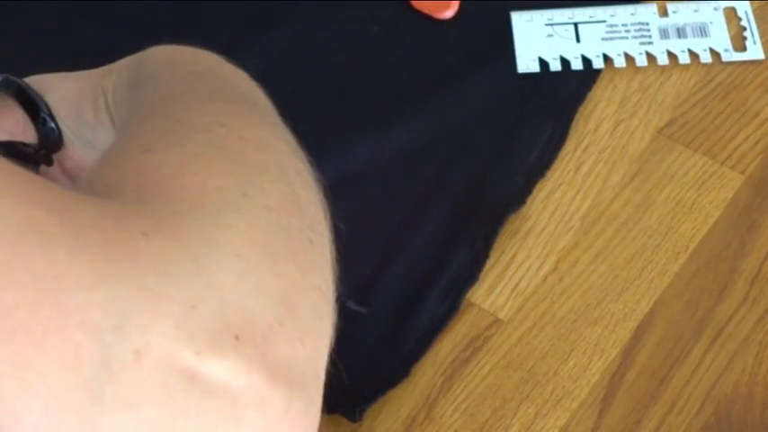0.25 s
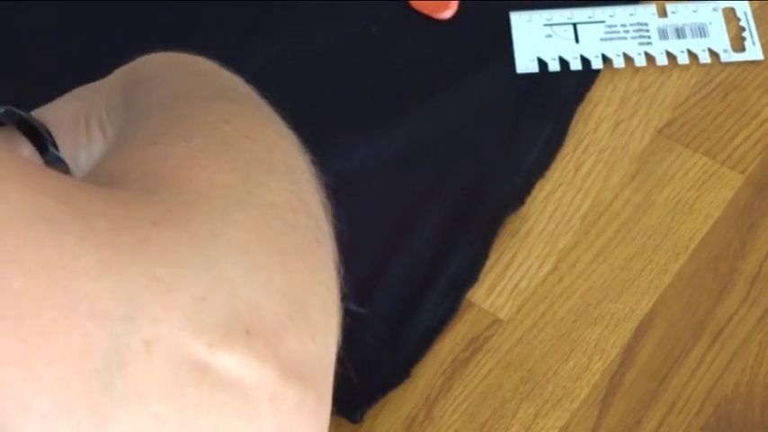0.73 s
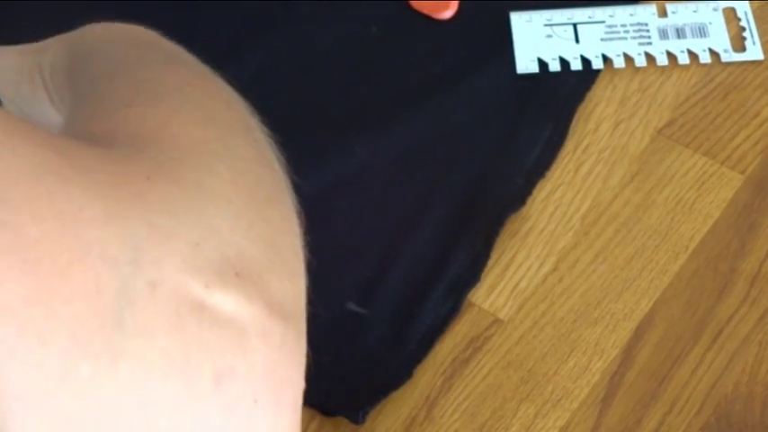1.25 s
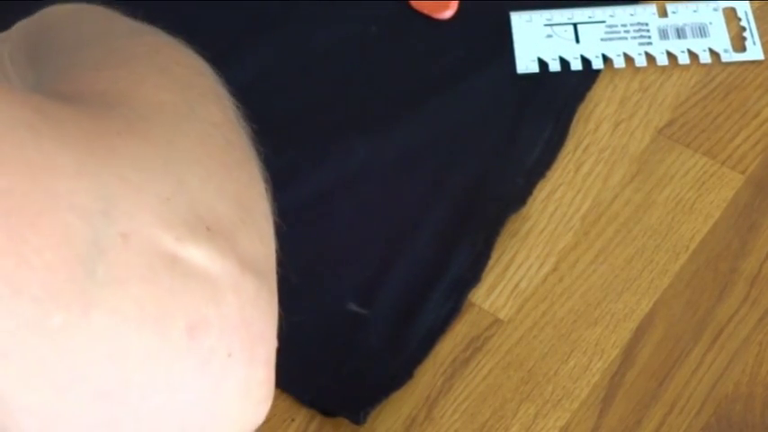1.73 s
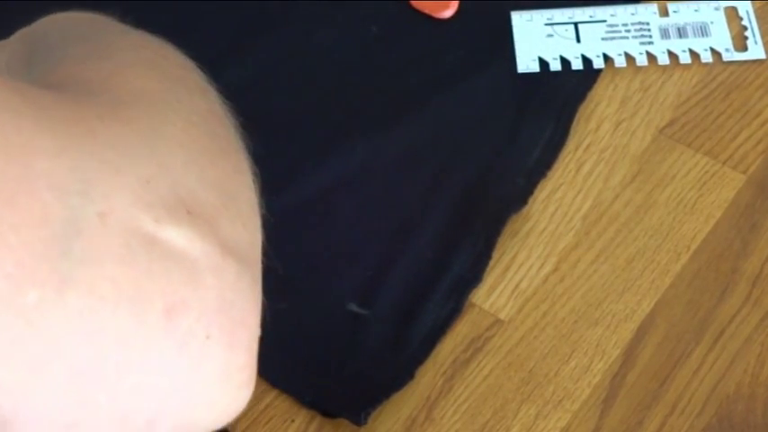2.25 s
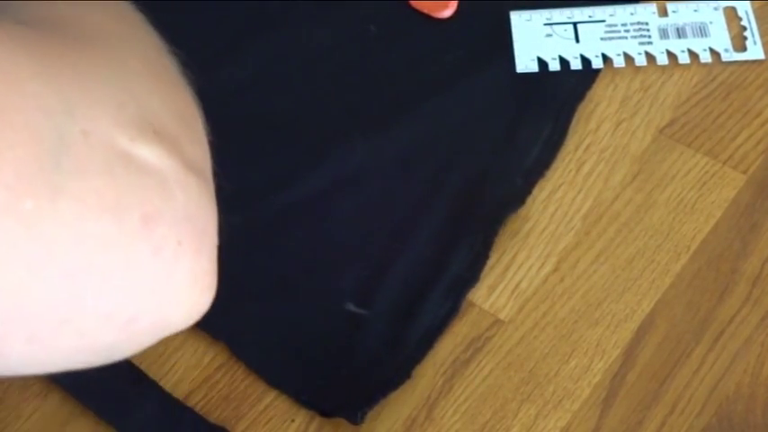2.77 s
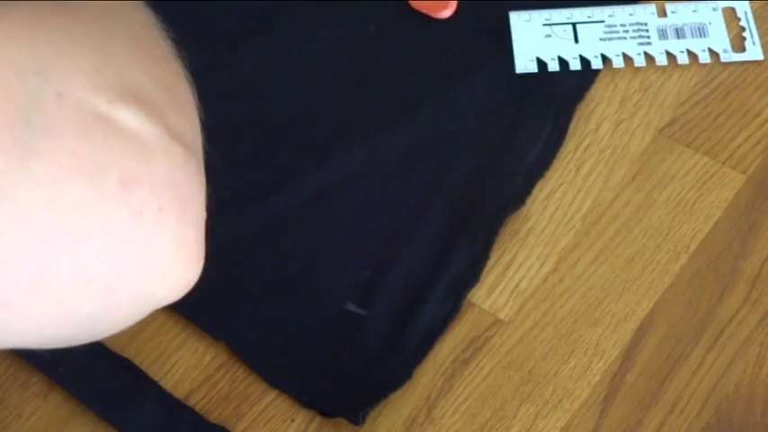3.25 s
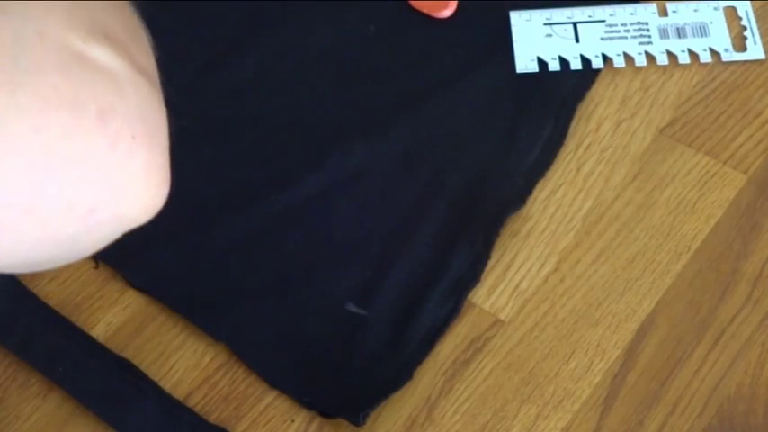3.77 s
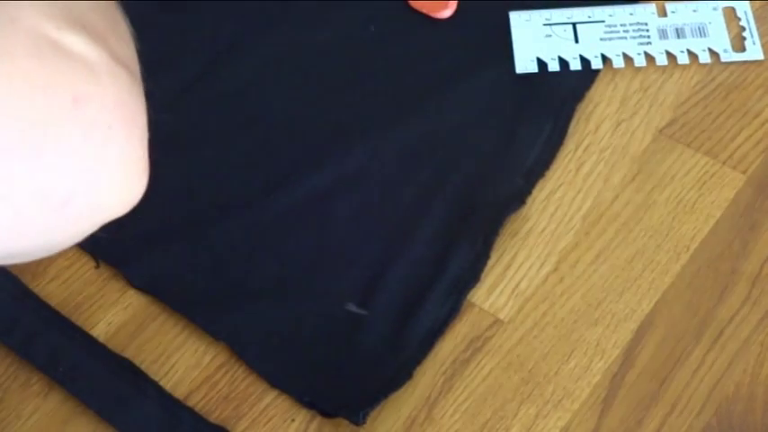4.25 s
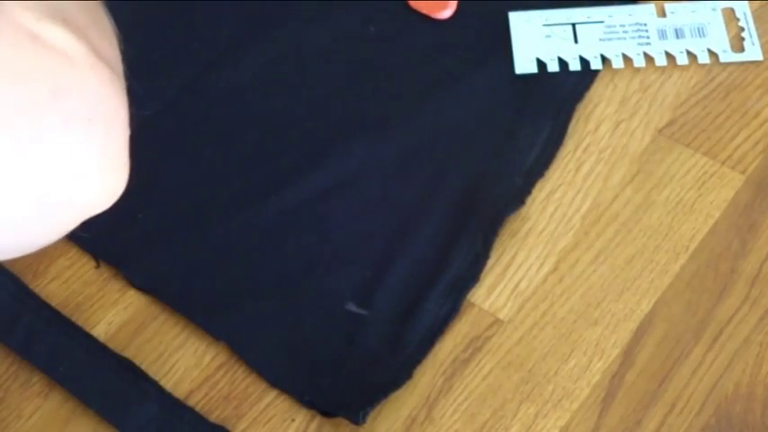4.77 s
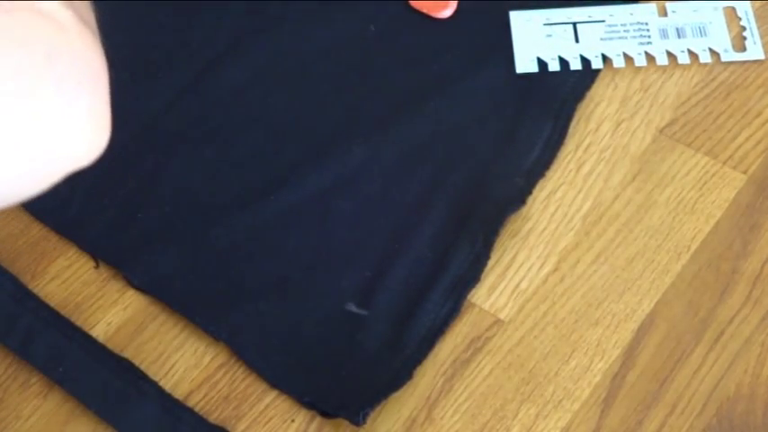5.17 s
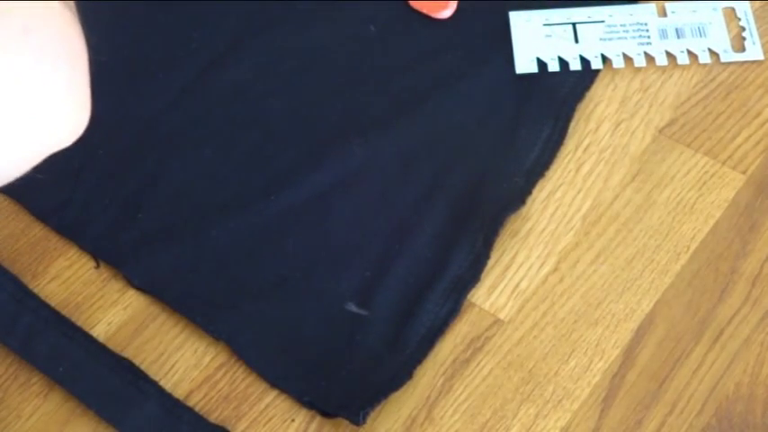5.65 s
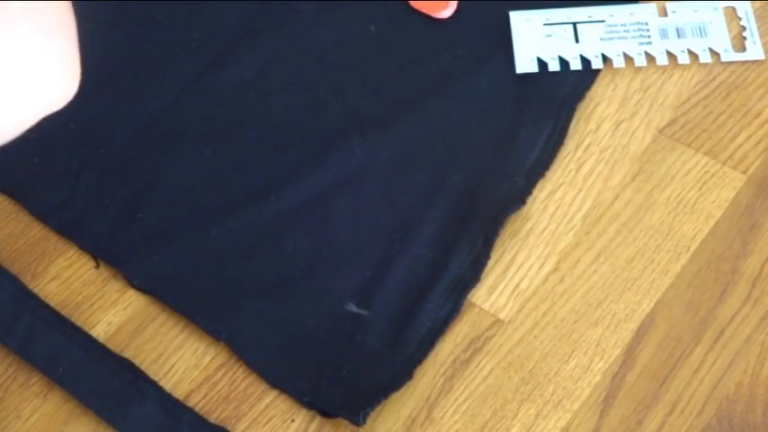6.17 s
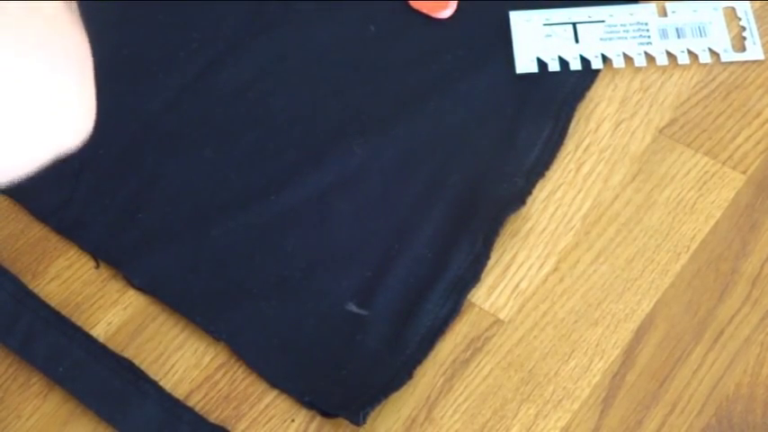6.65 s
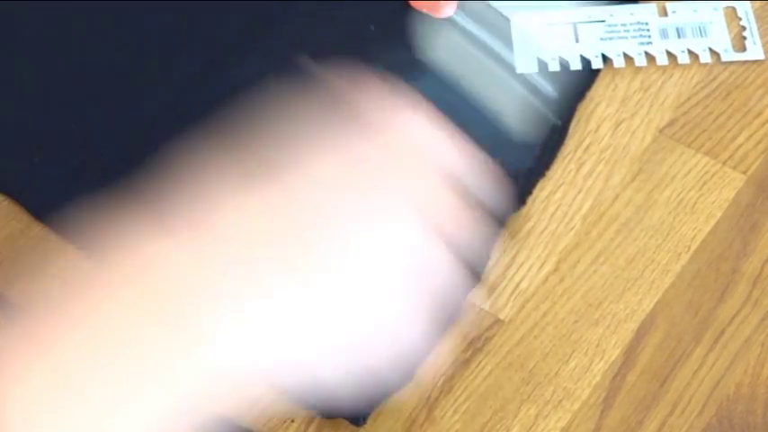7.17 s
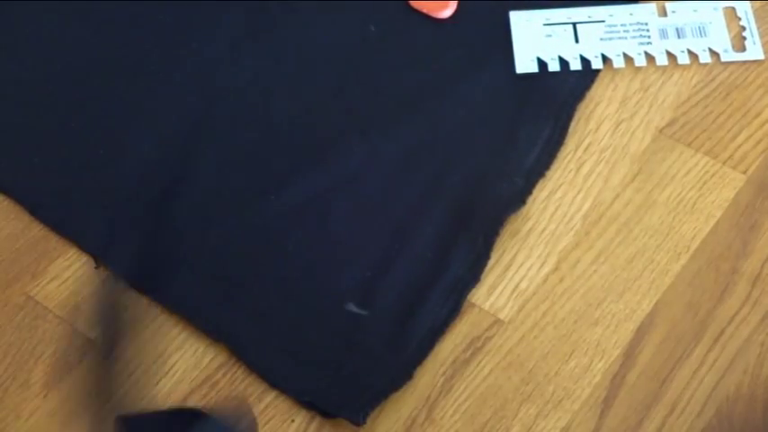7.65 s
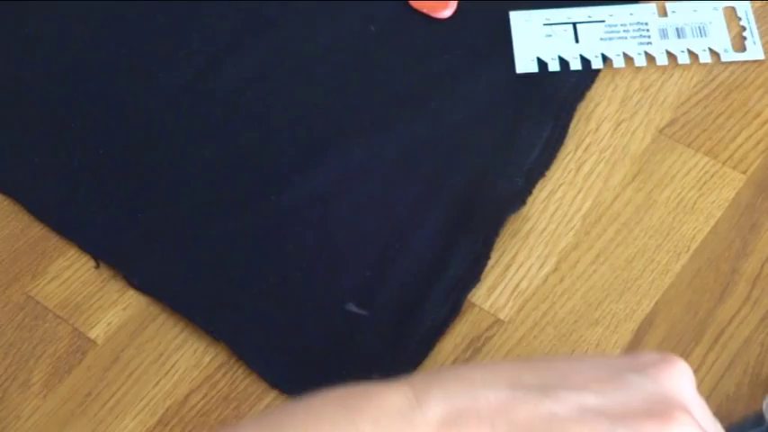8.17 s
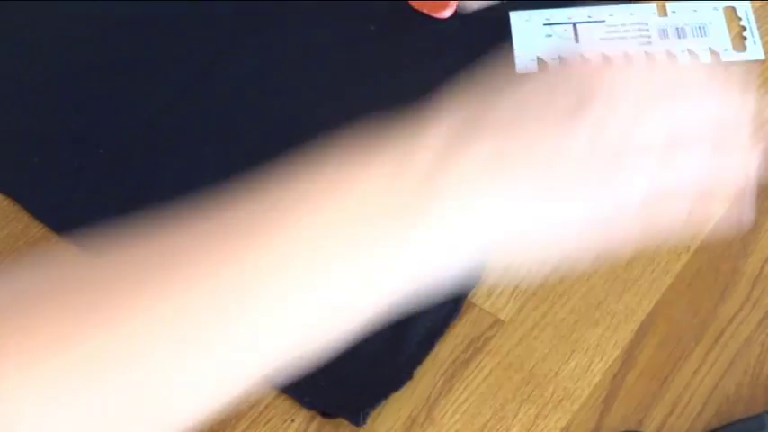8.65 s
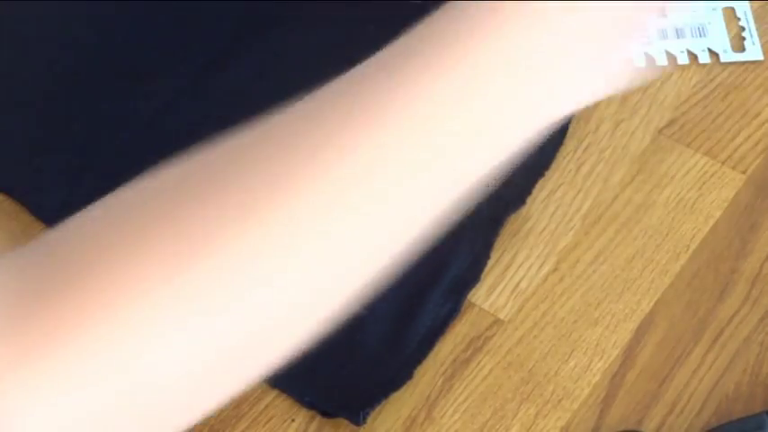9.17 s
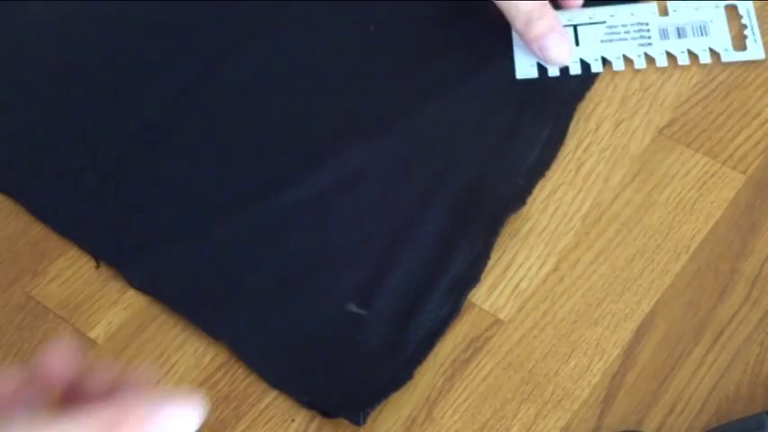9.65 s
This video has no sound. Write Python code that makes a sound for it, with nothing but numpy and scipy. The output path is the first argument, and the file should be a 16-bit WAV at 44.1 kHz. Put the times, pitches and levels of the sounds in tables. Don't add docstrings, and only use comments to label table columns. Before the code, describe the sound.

Scissors slice stretchy cloth in six crisp, ringing strokes on a wooden table, then clatter down before a heavy tool thumps, over faint fan hum.

```python
import sys
import numpy as np
from scipy import signal
from scipy.fft import rfft, irfft
from scipy.io import wavfile
from scipy.ndimage import uniform_filter1d

SR = 44100
rng = np.random.default_rng(int(sys.argv[2]) if len(sys.argv) > 2 else 0)


def int16_out(signal):
    q = np.round(np.clip(np.atleast_2d(signal).T, -1, 1) * 32767)
    wavfile.write(sys.argv[1], SR, q.astype(np.int16))


def magnitude_from_level(level_db):
    exponent = np.asarray(level_db, float) / 20
    return 10 ** exponent


N = 437031

# (bite [s], hardest moment [s], end [s], level at bite [dB], hardest level [dB])
STROKES = [
    (.41, 0.765, .93, -72, -42.5),
    (1.689, 1.82, 1.96, -48, -42),
    (2.99, 3.101, 3.26, -54, -38),
    (4.224, 4.33, 4.48, -58.5, -38),
    (5.417, 5.552, 5.76, -52.5, -45.5),
    (6.308, 6.45, 6.6, -66, -44),
]
# (frequency [Hz], width [Hz], level [dB])
BOARD_MODES = [(419, 100, 10), (522, 32.5, 18.5), (640, 57, 10), (715, 36, 10.5), (789, 210, 9.5),
               (885, 97, 14.5), (1023, 76, -1.5), (1190, 62, 5), (1390, 880, -0.5)]
# (frequency [Hz], width [Hz], level [dB])
THUD_MODES = [(208, 20, -5.5), (246, 40, -2.5), (288, 54, -0.5), (341, 53, 0), (376, 81, -5)]
# (frequency [Hz], width [Hz], level [dB])
CLACK_MODES = [(1594, 113, 17), (1645, 143, 16.5), (1877, 190, 17.5), (2306, 460, 18), (2820, 460, 13.5),
               (3160, 380, 14), (3580, 420, 4.5)]


def evened(x):
    return x / np.sqrt(np.mean(x ** 2) + 1e-20)


def peaked(x, span=200):
    return x / np.sqrt(uniform_filter1d(x ** 2, size=int(span)).max())


def read(points, hz):
    f, value = np.transpose(points)
    return np.interp(np.log(hz + 1), np.log(f + 1), value)


def add(mix, s, sound):
    part = mix[round(s * SR):][:len(sound)]
    part += sound[:len(part)]


def coloured(x, points):
    gain = magnitude_from_level(read(points, np.fft.rfftfreq(len(x), 1 / SR)))
    return irfft(rfft(x) * gain, len(x))


def ring(x, hz, width):
    r = np.exp(-np.pi * abs(width) / SR)
    pole = r * np.exp(2j * np.pi * hz / SR)
    return 2 * signal.lfilter([1 - r], [1, -pole], x).real


def resonate(x, hz, width):
    turn = np.exp(2j * np.pi * np.cumsum(hz * np.ones(len(x))) / SR)
    r = np.exp(-np.pi * abs(width) / SR)
    return 2 * (turn * signal.lfilter([1 - r], [1, -r], x / turn)).real


def snaps(count, per_s=5000, spread_db=2.5):
    chance, size, sign = rng.random((3, count))
    happens = chance < per_s / SR
    return happens * magnitude_from_level(-spread_db * np.log(size + 0.045)) * np.sign(sign - .5)


def hum():
    # (frequency [Hz], level [dB per Hz])
    alike = [(15, -41), (25, -7.5), (195, 1.5), (326, -1), (394, -6), (439, -2.5), (531, -5.5), (734, -8.5),
             (887, -7.5), (1100, -8.5), (1520, -9.5), (2280, -13.5), (3620, -13.5), (5280, -16),
             (16000, -19)]
    # (frequency [Hz], level [dB per Hz])
    opposed = [(15, -57), (25, -35), (64, -49), (114, -9), (405, -2.5), (988, -10), (1160, -9), (1560, -15),
               (1790, -11), (3520, -22), (10100, -33.5), (14800, -46), (16000, -23)]
    # (frequency [Hz], width [Hz], level [dB])
    fan_bands = [(764, 24.4, 15), (1238, 107, 11.5), (1515, 170, 11.5), (3545, 80, 13), (4470, 190, 7),
                 (15500, 430, 3)]
    alike_db, opposed_db = -61, -59
    frames, hz = N // 256 + 5, np.fft.rfftfreq(1024, 1 / SR)
    a, b, c, d, patches = rng.standard_normal((frames, 513, 5)).T
    patches = uniform_filter1d(patches, size=10, axis=0)
    patches = evened(uniform_filter1d(patches, size=14, axis=1))
    bands = sum(db / (1 + (2 * (hz - f) / w) ** 2) for f, w, db in fan_bands)

    def field(z, shape):
        z = z * magnitude_from_level((read(shape, hz) + bands)[:, None] + 1.4 * patches)
        return evened(signal.istft(z, nperseg=1024, noverlap=768)[1][:N])

    early = .6 * np.sin(2 * np.pi * hz * 9 / SR)[:, None]
    common = a + 1j * b
    mid = magnitude_from_level(alike_db) * field(common, alike)
    side = magnitude_from_level(opposed_db) * field(c + 1j * d - 1j * early * common, opposed)
    return np.array([mid + side, mid - side]) * magnitude_from_level(np.array([[1.3], [-1.3]]))


def room(x, swell=0.005):
    # (frequency [Hz], time [s])
    dying = [(100, 0.76), (260, 0.47), (700, 0.6), (1800, 0.51), (5000, 0.45), (12000, 0.28)]
    # (frequency [Hz], side share of the echoes [0-1])
    side_share = [(100, 0.071), (400, 0.25), (1200, 0.37), (3000, 0.26), (10000, 0.21)]
    taps = np.zeros((2, SR))
    at = np.arange(100, SR - 20, 20) + rng.integers(0, 20, (2, (SR - 101) // 20))
    np.put_along_axis(taps, at, rng.choice([-1., 1.], at.shape), 1)
    hz, t, z = signal.stft(taps, SR, nperseg=512)
    z *= magnitude_from_level(-60 * t / read(dying, hz)[:, None])
    z[1] *= read(side_share, hz)[:, None]
    build_up = 1 - np.exp(-np.arange(SR) / SR / swell)
    mid, side = signal.istft(z, SR, nperseg=512)[1][:, :SR] * build_up
    tail = np.array([mid + side, mid - side]) / np.linalg.norm(mid)
    return signal.fftconvolve(x[None], tail, axes=1)[:, :N]


def rustle(start, loudest, end, top_db):
    # (frequency [Hz], level [dB per Hz])
    cloth_colour = [(590, -39), (1000, 0), (1540, -7), (1960, -7.5), (5070, -2.5), (7880, -5.5),
                    (16000, -6)]
    quiet_db = -77
    start = max(start, 0)
    t = np.arange(start, end, 1 / SR)
    grains = snaps(count=17000, per_s=21000, spread_db=6.0)
    grains = evened(coloured(grains, cloth_colour))[:len(t)]
    level_db = np.interp(t, [start, loudest, end], [quiet_db, top_db, quiet_db])
    return start, magnitude_from_level(level_db) * grains


def cloth_sliding():
    # (start [s], loudest [s], end [s], level [dB])
    slides = [
        (0, -0.003, .12, -66),
        (2.0, 2.106, 2.36, -60),
        (6.723, 6.763, 6.89, -64.5),
        (6.89, 6.906, 6.97, -64),
        (6.968, 6.987, 7.19, -64),
        (7.196, 7.275, 7.33, -62.5),
        (7.667, 7.71, 7.98, -48),
        (8.849, 8.928, 9.1, -56.5),
        (9.696, 9.698, 9.735, -47),
        (9.753, 9.9, 9.99, -60),
    ]
    cloth = np.zeros(N)
    for row in slides:
        add(cloth, *rustle(*row))
    return cloth


def struck(drive, modes, weight_db=0, spot_db=1.05, broad=0.4):
    hz, width, db = np.transpose(modes)
    louder, detune = rng.standard_normal((len(modes), 2)).T
    band = signal.butter(3, [0.72 * hz[0], 1.244 * hz[-1]], "band", fs=SR, output="sos")
    soft = signal.sosfilt(band, drive)
    gains = magnitude_from_level(db + weight_db + spot_db * louder) * (-1) ** np.arange(len(hz))
    rings = sum(g * ring(soft, f, w) for g, f, w in zip(gains, hz * (1 + 0.026 * detune), width))
    filler = ring(soft, hz[len(hz) // 2], hz[-1] - hz[0])
    return peaked(evened(rings) + broad * evened(filler), span=865)


def boom(s, peak_db):
    # (frequency [Hz], width [Hz], level [dB])
    flexing = [(69, 11, -50), (127.8, 13.5, 0), (158, 34, -6.5), (203.2, 5.3, 1.5)]
    push = np.eye(1, 9000)[0]
    return s, magnitude_from_level(peak_db - 10.0) * struck(push, flexing, spot_db=-3.2, broad=0.037)


def rub(start, length, board_db, thud_db, clack_db):
    slowing = np.linspace(0, 1, round(length * SR)) ** 2
    drive = snaps(15000, per_s=1200)[:len(slowing)]
    levels_db = (board_db - 16.5 * slowing, thud_db - 16.5 * slowing, clack_db - 23.5 * slowing)
    body = 0
    for db, modes in zip(levels_db, (BOARD_MODES, THUD_MODES, CLACK_MODES)):
        body = body + magnitude_from_level(db - 8.0) * evened(struck(drive, modes))
    return max(start, 0), body * signal.windows.tukey(len(slowing), .15)


def knock(board_hz, s, board_db, thud_db, clack_db, tick_db, rattle=0.02):
    # (frequency [Hz], width [Hz], level [dB])
    tick_modes = [(4480, 1500, 0.5), (6800, 2900, -1.5), (9100, 3200, -8), (14000, 3700, -13)]
    t = np.arange(5000) / SR
    drive = snaps(len(t), per_s=1500) * magnitude_from_level(-25 * t / rattle + 1.5)
    drive[0] = 1.03
    near_db = -14 * np.log2(np.transpose(BOARD_MODES)[0] / board_hz) ** 2
    board = struck(drive * magnitude_from_level(-1800 * t), BOARD_MODES, near_db, broad=0.23)
    thud = struck(drive, THUD_MODES, broad=0.64)
    tick = struck(drive * magnitude_from_level(-3000 * t), tick_modes)
    hard_db = .4 * (tick_db - clack_db + 14) * np.log2(np.transpose(CLACK_MODES)[0] / 2400)
    clack = struck(drive * magnitude_from_level(-3500 * t), CLACK_MODES, hard_db, broad=0.52)
    blow = magnitude_from_level(board_db) * board + magnitude_from_level(thud_db) * thud + magnitude_from_level(clack_db) * clack + magnitude_from_level(tick_db) * tick
    return s - .002, magnitude_from_level(-5.5) * blow


def table_blows():
    # (time [s], board level [dB], thud level [dB], clack level [dB], board pitch [Hz])
    knocks = [(.153, -49.5, -42, -56, 453), (.485, -49, -49, -63, 464), (1.537, -58, -52.5, -74, 500),
              (1.714, -36, -40.5, -36.5, 830), (2.849, -33, -40.5, -41, 730),
              (2.934, -35.5, -43.5, -35, 574), (4.193, -45, -46, -58, 560), (4.229, -34, -45.5, -38, 640),
              (4.388, -39.5, -52.5, -52, 620), (5.008, -31, -34, -72, 720), (6.198, -43.5, -48.5, -75, 587),
              (6.258, -46, -69, -70, 586)]
    # (time [s], board level [dB], thud level [dB], clack level [dB], tick level [dB])
    drops = [
        (7.503, -28.5, -31.5, -26, -30),
        (7.511, -37, -63, -25.5, -39),
        (7.549, -27.5, -49, -52, -64),
        (7.668, -33, -52, -29.5, -36),
        (7.982, -34.5, -37, -40.5, -61),
        (8.017, -42, -60, -75, -57),
    ]
    # (time [s], board level [dB], thud level [dB], clack level [dB], tick level [dB])
    slaps = [
        (8.147, -29.5, -26.5, -42, -60),
        (8.188, -27.5, -42, -28.5, -45.5),
        (8.406, -52, -58, -53, -54.5),
        (8.452, -45, -41, -67, -74),
        (8.479, -26.5, -30, -26.5, -36.5),
        (8.509, -24.5, -35, -47, -76),
        (8.537, -45, -58, -29.5, -49),
        (8.624, -48, -50, -58, -57),
    ]
    # (time [s], peak level [dB])
    pushes = [(0.158, -54.5), (1.714, -50), (4.227, -47.5), (5.005, -52.5), (6.338, -55), (7.501, -32),
              (7.55, -35), (7.851, -39), (7.981, -44), (8.145, -24), (8.189, -42), (8.474, -22),
              (8.508, -28), (8.618, -35), (9.836, -46)]
    # (start [s], length [s], board level [dB], thud level [dB], clack level [dB])
    drags = [
        (0, 0.034, -50, -72, -49),
        (1.73, .17, -33.5, -40.5, -46.5),
        (6.2, 0.037, -68, -61, -74),
        (6.3, 0.14, -50, -43, -80),
        (7.67, 0.098, -45, -39.5, -33.5),
        (7.83, 0.057, -37, -35, -45),
        (8.55, 0.1, -29, -28.5, -46),
    ]
    spots = np.zeros((3, N))
    for k, (s, board_db, thud_db, clack_db, hz) in enumerate(knocks):
        tick_db = clack_db - 25
        add(spots[k % 3], *knock(hz, s, board_db, thud_db, clack_db, tick_db))
    for rows, board_hz in ((drops, 1120), (slaps, 766)):
        for k, row in enumerate(rows):
            add(spots[k % 3], *knock(board_hz, *row))
    for k, row in enumerate(pushes):
        add(spots[k % 3], *boom(*row))
    for k, row in enumerate(drags):
        add(spots[k % 3], *rub(*row))
    return spots


def close_touches():
    # (time [s], board level [dB], thud level [dB], clack level [dB], tick level [dB])
    taps = [
        (9.794, -53, -58, -56, -69),
        (9.808, -59, -54, -46.5, -57),
        (9.846, -54, -59, -58, -61),
    ]
    touches = np.zeros(N)
    for row in taps:
        add(touches, *knock(766, *row, rattle=.003))
    return touches


def cutting_point(s):
    point = 0
    for bite, _, end, *_ in STROKES:
        ramp = (s - bite + .04) / (end - bite + .04)
        point = point + np.clip(1.55 * ramp - .15, 0, 1) * (ramp <= 1)
    return point


def steel(drive, low_db, mid_db, point, between_db=-4, glide=.13):
    # (frequency [Hz], width [Hz], level [dB])
    free_ends = [(8850, 350, 0), (13950, 320, 1)]
    # (frequency [Hz], width [Hz], level [dB])
    blade_modes = [(2590, 70, 19), (3840, 390, 7), (4600, 1240, 7), (6010, 155, 19.5), (6790, 360, 15),
                   (8500, 32, 2), (9360, 120, -7), (10850, 83, 7.5), (11320, 180, -22), (12330, 660, 2.5),
                   (13500, 25, -29), (14800, 240, -13)]
    # (frequency [Hz], level [dB per Hz])
    shear = [(1180, -37), (2000, -16), (2530, -7.5), (3060, -30.5), (4120, -3), (7910, -10.5), (12400, -16),
             (16000, -19.5)]
    splits = [7500, 10200]
    groups = np.zeros((3, len(drive)))
    for k, (hz, width, db) in enumerate(free_ends):
        free = hz * (1 + glide * (point - .5))
        groups[k + 1] += magnitude_from_level(db) * resonate(resonate(drive, free, 2 * width), free, width)
    for (hz, width, db), grip in zip(blade_modes, rng.standard_normal(len(blade_modes))):
        wakes_db = 14 * (point - .7) * (11500 < hz < 13000)
        tone = ring(ring(drive, hz, 6 * width), hz * (1 + .012 * grip), width)
        groups[np.searchsorted(splits, hz)] += magnitude_from_level(db + wakes_db + 3.3 * grip) * tone
    wide, f = rfft(coloured(drive, shear)), np.fft.rfftfreq(len(drive), 1 / SR)
    under = [1 / (1 + (f / split) ** 14) for split in splits]
    parts = (under[0], under[1] - under[0], 1 - under[1])
    filled = []
    for group, part in zip(groups, parts):
        between = evened(irfft(wide * part, len(drive)))
        filled.append(evened(evened(group) + magnitude_from_level(between_db) * between))
    low, mid, high = filled
    return high + magnitude_from_level(mid_db) * mid + magnitude_from_level(low_db) * low


def slip(s, peak_db, low_db, mid_db, length, point):
    t, length = np.arange(3000) / SR, max(length, .003)
    shape = np.minimum(t / (0.51 * length), 1) * magnitude_from_level(-90 * np.maximum(t / length - 1, 0))
    burst = steel(shape * snaps(len(t), per_s=16000), low_db, mid_db, point, between_db=0.5)
    return s - .004, magnitude_from_level(peak_db - 8.5) * peaked(burst)


def stroke(bite, hardest, end, bite_db, top_db):
    start = bite - .04
    t = np.arange(start, end - 1 / SR, 1 / SR)
    t = t[:len(t) // 2 * 2]
    level_db = np.interp(t, [start, bite, hardest, end], [bite_db - 27, bite_db, top_db, -71])
    effort = np.maximum(level_db + 52.5, 0)
    low_db, mid_db = -2 - 1.44 * effort, -6.5 - 0.41 * effort
    clumps = uniform_filter1d(rng.standard_normal(30000), size=120)
    clumps = evened(uniform_filter1d(clumps, size=120))[:len(t)]
    threads = snaps(30000, per_s=2300, spread_db=3.5)[:len(t)]
    blades = steel(threads, low_db, mid_db, cutting_point(t), between_db=-4)
    return start, magnitude_from_level(level_db + 4.42 * clumps - 4.0) * blades


def ringing_blades():
    # (time [s], peak level [dB], low modes [dB], length [s])
    thread_bunches = [(0.426, -51, -7, 0.019), (0.461, -49, -12, 0.016), (.523, -45, -4, .011),
                      (.575, -45, -3, 0.012), (0.61, -39, -1, 0.0084), (.706, -33.5, -16, 0.011),
                      (0.727, -33.5, -13, 0.026), (0.758, -35, -21, 0.024), (0.814, -26.5, -19, 0.01),
                      (1.6534, -48, -1, 0.018), (1.686, -40.5, -8, 0.021), (1.788, -28, -42, 0.022),
                      (1.862, -37, -11, 0.016), (2.974, -40.5, -2, 0.025), (3.2, -44, -19, .015),
                      (4.212, -40, 0, 0.031), (4.389, -33, -40, 0.016), (4.429, -35, -11, 0.011),
                      (5.36, -53, 14, 0.017), (5.432, -57, -4, .011), (5.536, -31, -13.5, .02),
                      (5.6032, -34, -31, .014), (5.639, -27, -16.5, 0.013), (6.343, -48, -9, 0.01),
                      (6.386, -41, -18, 0.012), (6.424, -34, -27, 0.015), (6.505, -33, -29, 0.015)]
    # (time [s], peak level [dB], length [s], contact point [0 pivot - 1 tip])
    reopens = [
        (1.027, -36, 0.032, .3),
        (2.364, -36, 0.026, 0.36),
        (3.398, -42, 0.038, 0.85),
        (4.593, -48.5, 0.027, 0.7),
        (4.812, -43.5, 0.032, 0.54),
        (5.872, -42, 0.034, 1),
        (6.5764, -31.5, 0.0078, .3),
        (6.58, -23.5, 0.0127, 0.8),
        (6.81, -55, .012, .7),
        (6.901, -45, 0.027, 0.4),
    ]
    # (time [s], peak level [dB])
    nudges = [
        (9.6977, -48),
        (9.81, -46),
        (9.837, -48),
    ]
    blades = np.zeros(N)
    for row in STROKES:
        add(blades, *stroke(*row))
    for s, peak_db, low_db, length in thread_bunches:
        mid_db = -5 + 0.7 * low_db
        add(blades, *slip(s, peak_db, low_db, mid_db, length, cutting_point(s)))
    for s, peak_db, length, point in reopens:
        add(blades, *slip(s, peak_db, -7, -6, length, point))
    for s, peak_db in nudges:
        add(blades, *slip(s, peak_db, low_db=10, mid_db=-10, length=0.0083, point=.62))
    return blades


def scene():
    cloth, blows, touches = cloth_sliding(), table_blows(), close_touches()
    blows[0] += touches
    cutting = ringing_blades() + cloth
    near = touches + cutting * magnitude_from_level(np.array([[.3], [-.3]])) + blows.sum(0)
    echoes = magnitude_from_level(-4) * room(cutting) + magnitude_from_level(1) * sum(map(room, blows))
    return near + echoes + hum()


def top_cut(x):
    return signal.sosfilt(signal.butter(12, 16560, fs=SR, output="sos"), x)


def record(dry):
    low_pass = signal.firwin(511, 15800, window=("kaiser", 9), fs=SR)
    dull = signal.oaconvolve(dry, low_pass[None], "same")
    return top_cut(dull)


dry = scene()
out = record(dry)
int16_out(out)
```